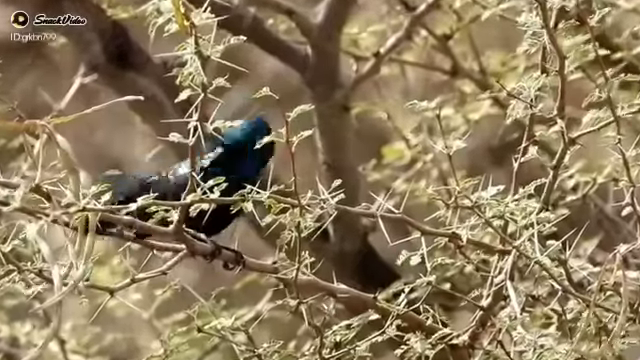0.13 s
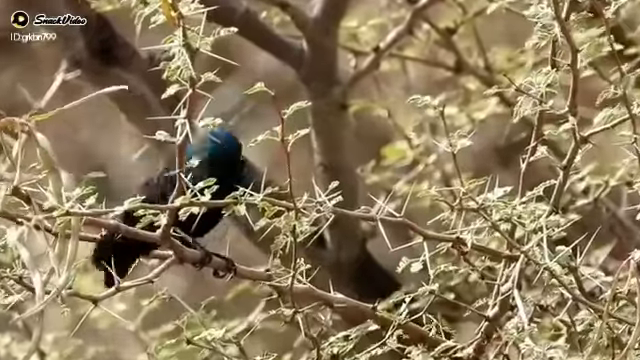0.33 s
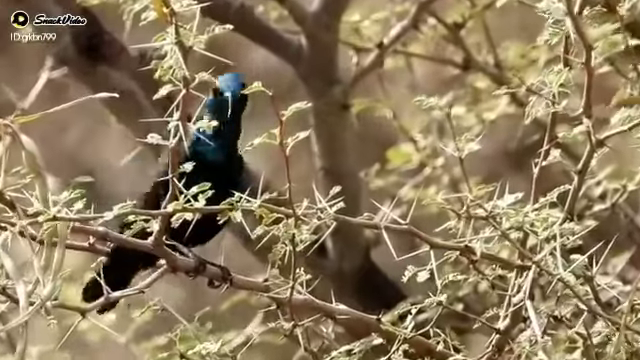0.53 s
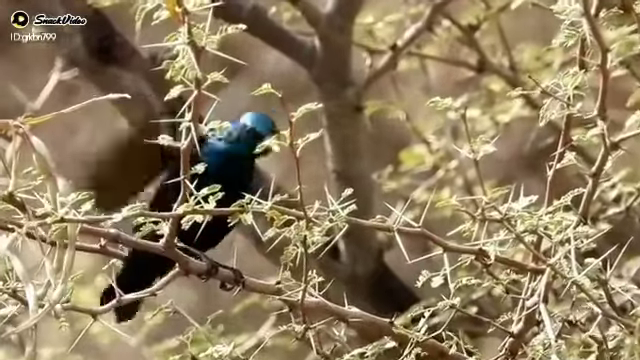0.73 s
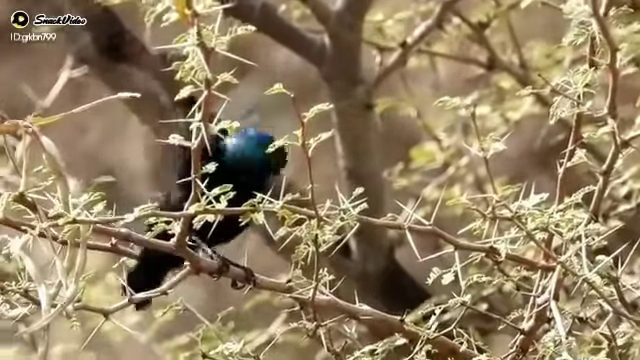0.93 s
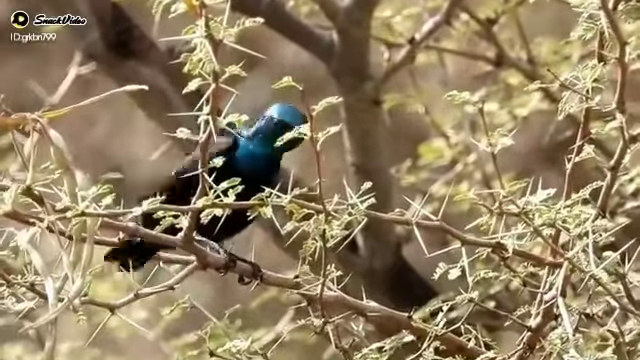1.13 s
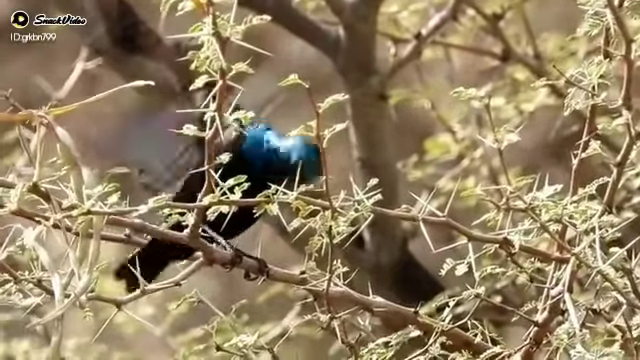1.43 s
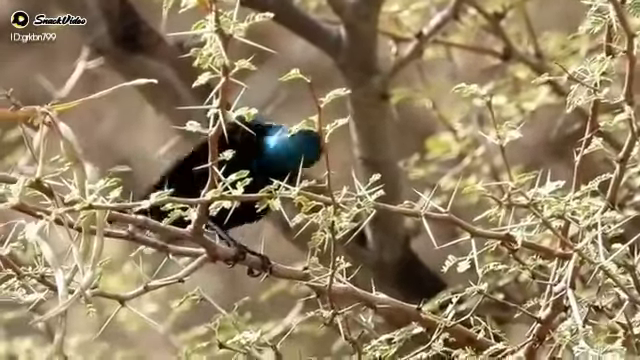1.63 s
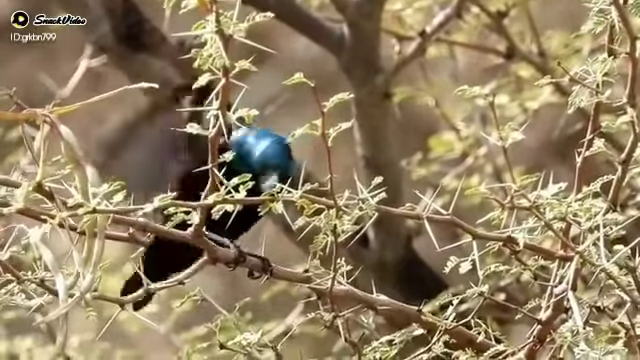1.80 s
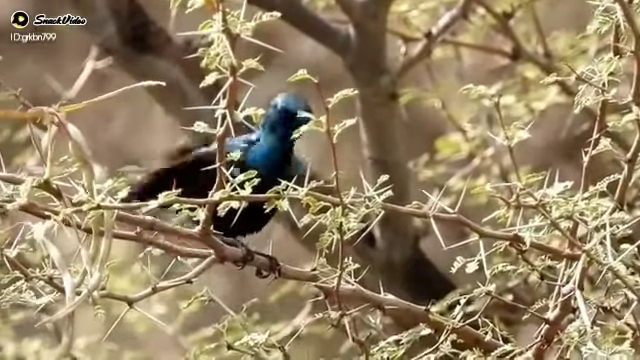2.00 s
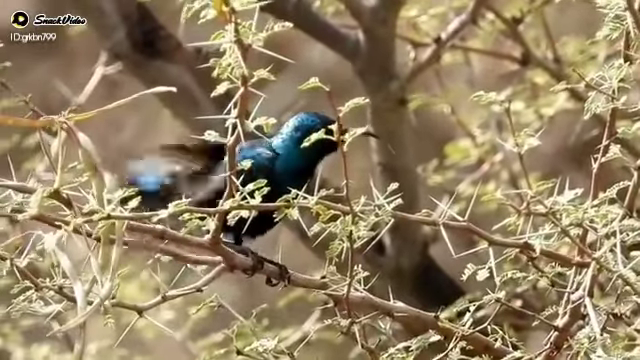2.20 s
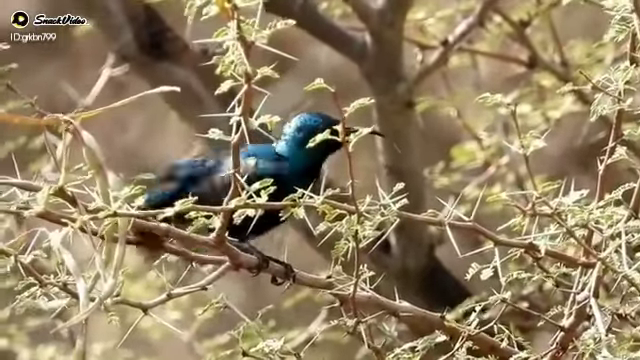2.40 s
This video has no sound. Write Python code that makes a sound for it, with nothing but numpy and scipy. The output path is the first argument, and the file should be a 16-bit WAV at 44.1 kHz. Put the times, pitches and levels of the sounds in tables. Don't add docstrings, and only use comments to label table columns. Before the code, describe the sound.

Small bird whistles a clear two-part call five times, with buzzy chirps from another bird between

```python
import sys
import numpy as np
from scipy import signal
from scipy.fft import rfft, irfft, next_fast_len
from scipy.io import wavfile
from scipy.ndimage import uniform_filter1d, map_coordinates

SR = 44100
rng = np.random.default_rng(int(sys.argv[2]) if len(sys.argv) > 2 else 0)


def transcribe(signal):
    frames = np.atleast_2d(signal).T
    limited = np.clip(frames, -1, 1)
    pcm = np.round(limited * 32767).astype(np.int16)
    wavfile.write(sys.argv[1], SR, pcm)


def gain_from_decibels(decibels):
    exponent = np.asarray(decibels, float) / 20
    return 10 ** exponent


N = 112454


def unit(x):
    return x / np.sqrt(np.mean(x ** 2) + 1e-20)


def along(points, hz):
    f, v = np.transpose(points)
    return np.interp(np.log(hz + 1), np.log(f + 1), v)


def wobble(rate):
    coarse = np.arange(0, N + 8, 8)
    knots = rng.standard_normal(int(N * rate / SR) + 4)
    return np.interp(np.arange(N), coarse, map_coordinates(knots, [coarse * rate / SR]))


def fuzz(rate):
    return unit(wobble(rate))


def filtered(x, response):
    m = next_fast_len(N + SR // 2)
    return irfft(rfft(x, m) * response(np.fft.rfftfreq(m, 1 / SR)), m)[..., :N]


# (frequency [Hz], likeness [0-1])
ALIKE = [(30, .6), (70, .1), (110, .2), (150, .93), (280, 0.9), (610, 0.94), (1330, 0.6), (2900, 0.81),
         (6290, .03), (13600, 0.25)]


def rush(gain, patchy_db):
    z = signal.stft(rng.standard_normal((2, N)), nperseg=512)[2]
    field = uniform_filter1d(rng.standard_normal(z.shape[1:]), 6, 0)
    field = uniform_filter1d(field, 14, 1)
    pair = signal.istft(z * gain_from_decibels(patchy_db * unit(field)), nperseg=512)[1][:, :N]

    def mid_side(hz):
        turn = np.arccos(np.clip(along(ALIKE, hz), -1, 1)) / 2
        return gain(hz) * [np.cos(turn), np.sin(turn)]

    mid, side = filtered(pair, mid_side)
    return unit(np.array([mid + side, mid - side]))


# (frequency [Hz], level [dB per Hz])
AIR = [(15, -72), (25, -17), (75, -19), (213, -4.5), (642, -7), (800, -5), (997, -13.5), (1520, -9.5),
       (3000, -14.5), (3900, -44), (6600, -120)]
# (frequency [Hz], level [dB per Hz])
FAR = [(1760, -40), (3000, -14), (3810, -10.5), (4090, -2.5), (4450, -7), (5270, -5.5), (6570, -13.5),
       (10300, -24), (12000, -34.5), (14100, -66.5)]
# (time [s], level [dB])
AIR_LEVEL = [(0.0, -50.5), (1.63, -52), (2.18, -50.5), (2.33, -60), (2.42, -55.5), (2.55, -57)]
# (time [s], level [dB])
FAR_LEVEL = [(0, -72.5), (.87, -70), (1.05, -74), (1.3, -77), (1.6, -73), (1.95, -75.5), (2.2, -70.5),
             (2.36, -82), (2.55, -74.5)]
LOW_CUT_HZ, AIR_PAN_DB, FAR_DB = 36, -.9, -48
HUM_HZ, HUM_WIDTH_HZ, HUM_DB = 198.2, 10.3, -52.5


def background():
    t = np.arange(N) / SR
    wind_db = np.interp(t, *np.transpose(AIR_LEVEL))
    far_db = np.interp(t, *np.transpose(FAR_LEVEL))
    far_db = far_db - far_db.mean()

    def wind_colour(f):
        return gain_from_decibels(along(AIR, f)) * (f < 3000) / (1 + (LOW_CUT_HZ / (f + 1)) ** 4)

    air = gain_from_decibels(wind_db + 3.5 + 0.95 * wobble(7.9)) * rush(wind_colour, patchy_db=2.0)
    far = rush(lambda f: gain_from_decibels(along(FAR, f)) * (f >= 3000), patchy_db=2.5)
    top = filtered(far, lambda f: 1 / (1 + (8000 / (f + 1)) ** 6))
    far = far - top + gain_from_decibels(far_db) * top
    far = gain_from_decibels(FAR_DB + 0.84 * far_db + 0.63 * wobble(6.6)) * far
    hum = filtered(rng.standard_normal(N), lambda f: 1 / (1 + ((f - HUM_HZ) / HUM_WIDTH_HZ) ** 2))
    hum = filtered(unit(hum), lambda f: np.exp([[-.12j], [.12j]]))
    return (air + far) * gain_from_decibels([[AIR_PAN_DB / 2], [-AIR_PAN_DB / 2]]) + gain_from_decibels(HUM_DB) * hum


# (frequency [Hz], time to fall by 60 dB [s])
BUSH = [(2000, 0.4), (5000, 0.3), (10000, 0.093)]


def echoes(x, gap):
    hz, t, z = signal.stft(rng.standard_normal((2, SR // 2)), SR, nperseg=256)
    tail = signal.istft(z * gain_from_decibels(-60 * t / along(BUSH, hz)[:, None]), SR, nperseg=256)[1]
    tail = np.pad(tail / np.linalg.norm(tail[0]), ((0, 0), (int(gap * SR), 0)))
    return signal.fftconvolve(x * np.ones((2, 1)), tail, axes=1)[:, :N]


# (peak time [s], width [s], peak level [dB], pitch [Hz])
PULSES = [(0.2308, 0.0014, -22, 5260), (0.2359, 0.0009, -20, 5660), (0.24, 0.0019, -15, 5100),
          (0.2451, 0.0008, -15, 5250), (0.2484, 0.001, -21, 5320), (0.2517, 0.0015, -20, 5330),
          (0.2558, 0.001, -16, 5120), (0.2586, 0.0006, -18, 5220), (0.2613, 0.0008, -15, 5110),
          (0.264, 0.0006, -18, 5030), (0.2702, 0.001, -18, 5250), (1.001, 0.0012, -26, 5700),
          (1.0043, 0.0006, -20, 5340), (1.011, 0.0025, -21, 5440), (1.0162, 0.0018, -16, 5150),
          (1.021, 0.001, -17, 5370), (1.025, 0.0012, -16, 5330), (1.0298, 0.0007, -20, 5480),
          (1.0344, 0.0007, -23, 5880), (1.0406, 0.0011, -26, 5250), (1.7168, 0.0008, -21, 6490),
          (1.7222, 0.0009, -19, 4910), (1.7253, 0.0007, -20, 5610), (1.7284, 0.0015, -16, 5190),
          (1.7365, 0.0006, -15, 5560), (1.7394, 0.0023, -12, 5370), (1.7451, 0.0011, -11, 5340),
          (1.7508, 0.0009, -11, 5320), (1.7544, 0.0005, -15, 5860), (1.7582, 0.0021, -12, 5630),
          (1.7631, 0.0006, -16, 5990), (2.2343, 0.0011, -19, 5670), (2.238, 0.0013, -12, 5450),
          (2.244, 0.0013, -9, 5460), (2.2478, 0.001, -18, 5490), (2.2534, 0.0008, -12, 5580),
          (2.2632, 0.0007, -17, 5420), (2.2679, 0.0008, -19, 5330)]
PULSE_RISE_HZ_PER_S, PULSE_WIDER, PULSE_DB = 150000, 1.25, .5


def pulses():
    out, t = np.zeros(N), np.arange(-300, 300) / SR
    for (s, wide, db, hz), turn in zip(PULSES, rng.uniform(0, 2 * np.pi, len(PULSES))):
        ping = np.sin(turn + 2 * np.pi * (hz + PULSE_RISE_HZ_PER_S * t) * t)
        bell = np.exp(-(t / (PULSE_WIDER * wide)) ** 2)
        out[round(s * SR) - 300:][:len(t)] += gain_from_decibels(db + PULSE_DB) * bell * ping
    return out


# (peak time [s], rise [s], level [dB], centre pitch [Hz], left over right [dB])
CHIRPS = [(0.252, 0.018, -21, 5300, -4.5), (1.022, 0.017, -19.5, 5670, -3), (1.745, 0.013, -15, 5350, -0.5),
          (2.2435, 0.014, -16.5, 5740, -2.5), (1.675, 0.039, -36, 5460, 0), (1.860, 0.016, -36.5, 4950, -3),
          (2.365, .017, -31.5, 6000, -1), (1.5, 0.016, -49.5, 5300, -3), (1.9, 0.017, -44, 6500, -3),
          (0.019, 0.036, -44.5, 5300, 0), (0.42, 0.0224, -46, 6200, 2.5)]
# (frequency [Hz], level [dB per Hz])
BEAK = [(1760, -56.5), (3000, -26.5), (3550, -20.5), (3780, -27.5), (4040, -16), (5460, -5.5), (6100, -18),
        (7990, -34.5), (14000, -28)]
# (peak time [s], half-length [s], level [dB], centre [Hz])
HISSES = [
    (0.21, 0.0055, -40.5, 2950),
    (0.237, 0.011, -53.5, 9100),
    (0.96, 0.0062, -34, 7040),
    (1.724, 0.015, -27.5, 6530),
    (2.22, 0.0084, -30, 7640),
    (0.27, .006, -69, 8600),
    (.99, .004, -67.5, 12000),
    (1.72, .004, -76.5, 13000),
    (2.229, .005, -65, 12800),
    (1.64, .03, -58, 10200),
]
BUZZ_HZ, FALL_OVER_RISE = 290, 1.36
LAG_S = .00005
BREATHY_DB, BREATH_EARLY_S, HISS_WIDTH_HZ, HISS_TOP_DB = -8, 0.0045, 910, -18


def chirpers():
    t, out, near = np.arange(N) / SR, np.zeros((2, N)), pulses()

    def beak_colour(f):
        return gain_from_decibels(along(BEAK, f)) * (f > 2600) / (1 + (f / 9000) ** 8)

    def swell(at, rise, fall=FALL_OVER_RISE):
        return np.exp(-.5 * ((t - at) / np.where(t < at, rise, rise * fall)) ** 2)

    for k, (s, rise, db, hz, pan_db) in enumerate(CHIRPS):
        cycle = (BUZZ_HZ * (t - s) + .5 + .13 * wobble(120)) % 1 - .5
        gate = (np.exp(-(cycle / .27) ** 2) + .2) * gain_from_decibels(2.2 * wobble(150))
        turn = 2 * np.pi * np.cumsum(hz + 700 * cycle + 200 * wobble(200)) / SR
        breath = (gate + 1.5) * rng.standard_normal((2, N))
        breath = unit(filtered(breath, lambda f: beak_colour(f * 5400 / hz)))
        if k < 4:
            voice = near * (abs(t - s) < .05) / gain_from_decibels(db - 2)
        else:
            voice = swell(s, 0.86 * rise, fall=1.3) * unit(gate * np.sin(turn))
        ports = filtered(voice, lambda f: np.exp(1j * np.pi * LAG_S * f * np.array([[-1], [1]])))
        ports += gain_from_decibels(BREATHY_DB) * swell(s - BREATH_EARLY_S, rise) * (breath + 0.6 * breath[::-1])
        out += gain_from_decibels(db - 1 + np.array([[pan_db / 2], [-pan_db / 2]])) * ports

    for s, half, db, hz in HISSES:
        def hiss_colour(f):
            treble = (f > hz) * np.exp(-((f - hz) / 4000) ** 2)
            return np.exp(-((f - hz) / HISS_WIDTH_HZ) ** 2) + gain_from_decibels(HISS_TOP_DB) * treble

        hiss = unit(filtered(rng.standard_normal((2, N)), hiss_colour))
        out += gain_from_decibels(db + np.array([[-1.5], [1.5]])) * swell(s, half, fall=1.9) * hiss
    return out


OCTAVE_DB, ATTACK_S = -33, .0032


def note(s, long, db, hz, flutter_db, waver_hz, release=.002, hoarse=.1):
    t = np.arange(N) / SR - s
    shape = np.clip(t / ATTACK_S, 0, 1) ** 2 * np.exp(-np.clip(t - long, 0, None) / release)
    turn = 2 * np.pi * np.cumsum(hz + waver_hz * wobble(200)) / SR
    tone = (1 - hoarse + hoarse * fuzz(420)) * np.sin(turn)
    tone += gain_from_decibels(OCTAVE_DB) * fuzz(450) * np.sin(2 * turn)
    return np.sqrt(2) * gain_from_decibels(db + flutter_db * wobble(220)) * shape * tone


# (time [s], length [s], level [dB], start pitch [Hz], end pitch [Hz])
WHISTLES = [
    (0.482, 0.063, -20.5, 2775, 2832),
    (0.826, 0.0765, -19, 2710, 2887),
    (1.166, 0.074, -15.5, 2792, 2780),
    (1.611, 0.075, -18, 2778, 2700),
    (2.103, 0.078, -17.5, 2617, 2628),
]
RELEASES_S = [0.015, 0.0058, 0.0095, 0.006, 0.0055]
# (time [s], width [s], level lost [dB], share of the drop to the low voice [0-1])
CATCHES = [(.508, 0.0032, 9, 0.97), (.5145, 0.0028, 13, 0), (.522, .006, 4, 0), (.5315, 0.0036, 12, 0.98),
           (0.5764, .006, 11, 0.03), (.8465, .0015, 4.5, 0.04), (2.11, .009, 0, 0.03), (.865, .005, 2, 0),
           (0.8534, .0055, 12.5, 1), (0.8691, 0.005, 14, 0.09), (0.876, .005, 13.5, .75),
           (0.884, 0.0037, 5.5, 0), (0.9, 0.0039, 0, 0.02), (0.901, 0.015, 3.5, 0), (1.1933, .0055, 8.5, 1),
           (1.2151, 0.0051, 11.5, 0.99), (1.246, 0.0061, 5, 0.15), (1.640, 0.0042, 11, 1),
           (2.132, 0.0088, 9.5, .6), (2.1424, 0.0039, 9, 0), (2.141, 0.018, 2.5, 0),
           (2.152, 0.0066, 12.5, 0.81)]
# (time [s], length [s], level [dB], pitch [Hz])
LEADS = [(0.419, .012, -36.5, 2380), (0.434, 0.0077, -22.5, 2690), (0.448, 0.0024, -27, 2720),
         (0.459, 0.0048, -30.5, 2350), (0.477, 0.0023, -30, 2700), (0.764, 0.0093, -30.5, 2495),
         (0.775, 0.015, -24, 2694), (0.804, 0.0033, -28.5, 2174), (0.825, 0.0035, -28, 2710),
         (1.103, 0.0093, -31.5, 2550), (1.116, 0.0098, -22.5, 2680), (1.129, 0.0075, -31, 2674),
         (1.158, 0.0028, -23, 2750), (1.549, 0.0047, -29, 2620), (1.554, 0.0053, -25, 2632),
         (1.565, 0.009, -22.5, 2740), (1.587, 0.0031, -27.5, 2296), (1.602, 0.009, -30.5, 2660),
         (2.038, 0.0097, -35, 2434), (2.052, 0.011, -27.5, 2640), (2.07, 0.0047, -29, 2745),
         (2.097, 0.0023, -29, 2800)]
# (time [s], length [s], level [dB], pitch [Hz])
SLIPS = [
    (0.458, 0.024, -38.5, 3610),
    (0.799, 0.022, -34, 3560),
    (1.144, 0.024, -32.5, 3515),
    (1.589, 0.024, -37.5, 3470),
    (2.072, 0.027, -35.5, 3430),
]
CATCH_HZ = 2150
RECOVER_S, RECOVER_SHARE = .002, .3
SWELL_DB, SWELL_S = 6, .010
ARCH_HZ = 198.8
RASP_DB, RASP_HZ, RASP_WIDTH_HZ, RASP_EARLY_S = -41.5, 2350, 327, 0.1
SCRATCH_DB = -5


def whistler():
    t, out = np.arange(N) / SR, np.zeros(N)
    slack = sum(drop * np.exp(-((t - s) / (0.56 * w)) ** 4) for s, w, _, drop in CATCHES)
    late = sum(drop * (t > s) * np.exp(-np.abs(t - s - w / 2) / RECOVER_S) for s, w, _, drop in CATCHES)
    slack = np.maximum(np.clip(slack, 0, 1), RECOVER_SHARE * late)
    lost_db = sum(db * np.exp(-((t - s) / (0.49 * w)) ** 4) for s, w, db, _ in CATCHES)
    rasp = filtered(rng.standard_normal(N), lambda f: np.exp(-((f - RASP_HZ) / RASP_WIDTH_HZ) ** 2))
    rasp = unit(rasp)
    for (s, long, db, hz0, hz1), release in zip(WHISTLES, RELEASES_S):
        pitch = np.interp(t, [s, s + long], [hz0, hz1])
        pitch = pitch + slack * (CATCH_HZ - pitch)
        level_db = db - lost_db - SWELL_DB * np.exp(-np.abs(t - s) / SWELL_S)
        out += note(s, long, level_db, pitch, flutter_db=.6, waver_hz=30, release=release, hoarse=.06)
        breath_times = [s - RASP_EARLY_S, s - .04, s + long, s + long + 0.029]
        out += gain_from_decibels(RASP_DB) * rasp * np.interp(t, breath_times, [0, 1, 1, 0])
    for s, long, db, hz in LEADS:
        arch = np.clip((t - s) / (long + 0.0029) * 2 - 1, -1.5, 1.5) ** 2
        pitch = hz - ARCH_HZ * arch
        out += note(s, long, db, pitch, flutter_db=1.7, waver_hz=40.35, release=0.0034, hoarse=0.12)
    for s, long, db, hz in SLIPS:
        out += note(s, long, db, hz, flutter_db=1.5, waver_hz=70, release=.012, hoarse=.55)
        scratch = rng.standard_normal(N) * gain_from_decibels(3.8 * wobble(250))
        scratch = unit(filtered(scratch, lambda f: np.exp(-((f - 2800) / 800) ** 4)))
        out += gain_from_decibels(db + SCRATCH_DB) * scratch * np.exp(-((t - s - long / 2) / long) ** 2)
    return out


NEAR_LEAD = 0.37
WHISTLE_ECHO_DB, CHIRP_ECHO_DB = -19, -15.5


def scene():
    near, buzz = whistler(), chirpers()
    ports = filtered(near, lambda f: np.exp(.5j * NEAR_LEAD * np.array([[1], [-1]])))
    whistles = ports + gain_from_decibels(WHISTLE_ECHO_DB) * echoes(near, 0.0076)
    chirps = buzz + gain_from_decibels(CHIRP_ECHO_DB) * echoes(buzz, .006)
    return whistles + chirps + background()


def top_cut(x):
    return signal.sosfilt(signal.butter(12, 14250, fs=SR, output="sos"), x)


def record(dry):
    return top_cut(dry)


dry = scene()
out = record(dry)
transcribe(out)
```